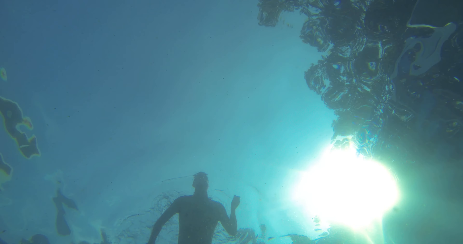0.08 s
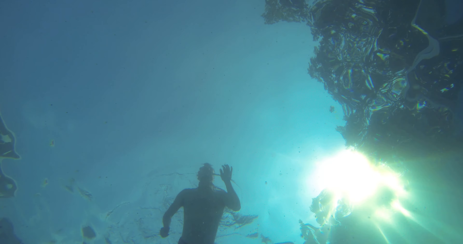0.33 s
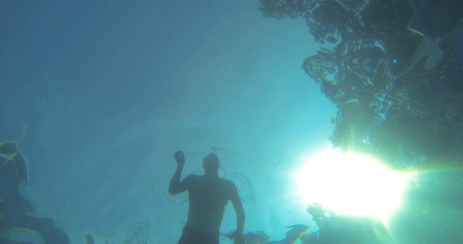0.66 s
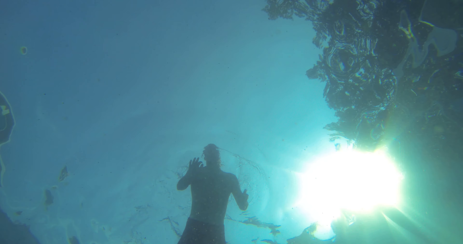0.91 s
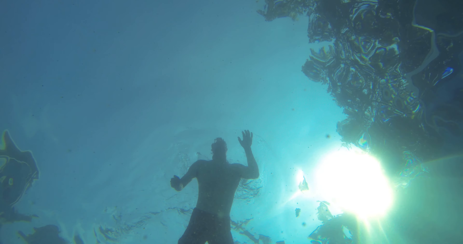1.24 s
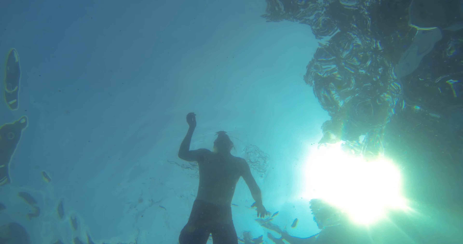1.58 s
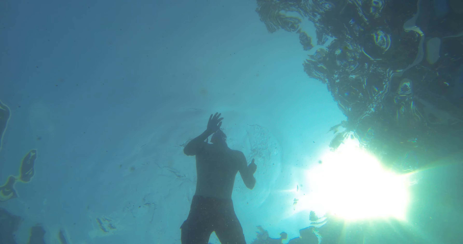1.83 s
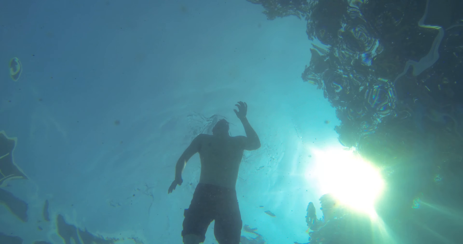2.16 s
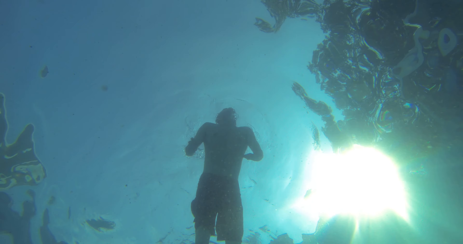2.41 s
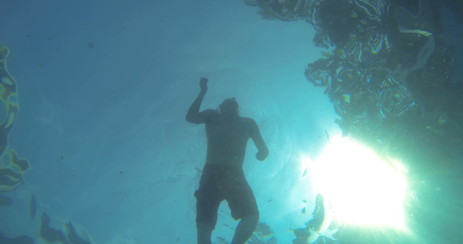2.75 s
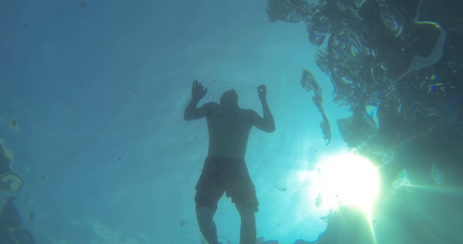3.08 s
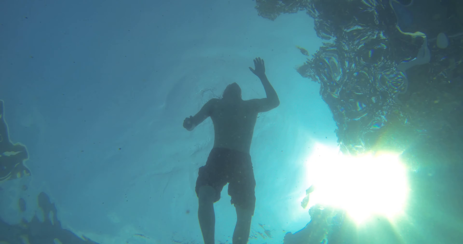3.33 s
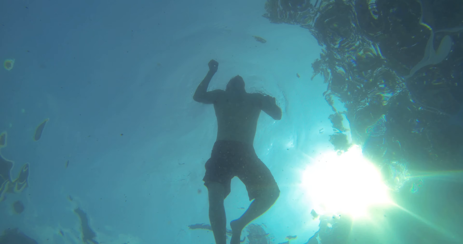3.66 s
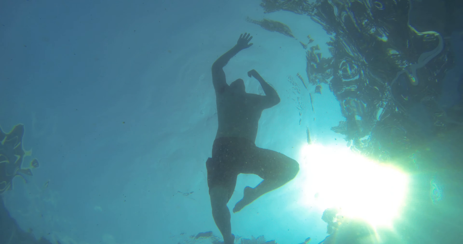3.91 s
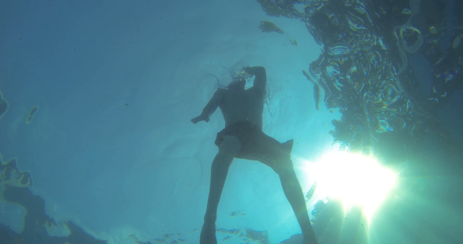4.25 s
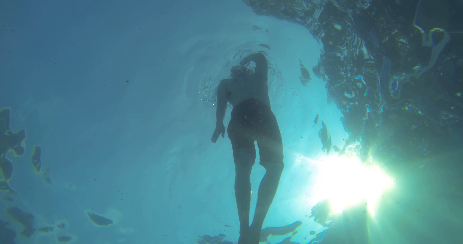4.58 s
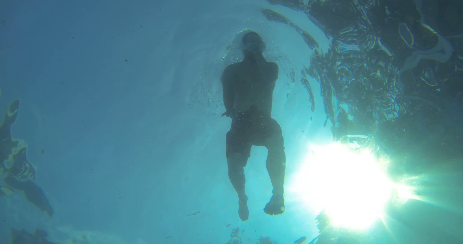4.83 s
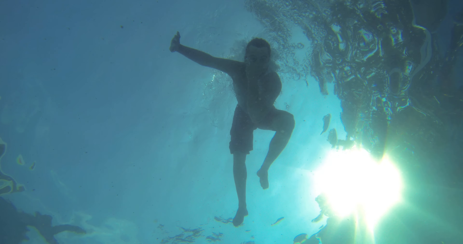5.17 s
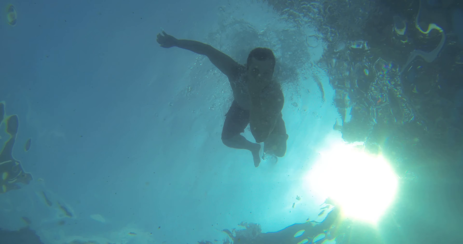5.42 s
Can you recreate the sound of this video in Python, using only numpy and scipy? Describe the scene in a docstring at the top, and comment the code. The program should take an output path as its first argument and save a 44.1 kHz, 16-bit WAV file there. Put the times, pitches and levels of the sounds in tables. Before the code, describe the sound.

The sound is underwater and muffled, picked up through a waterproof camera case below a swimmer. A faint low hum, soft hiss and thin, high pulsing whine from the camera run throughout. For the first four seconds the swimmer paddles gently at the surface: soft irregular sloshes, a fine trickle and small ringing bubble plinks, a little clearer around 2.5 seconds. At about 4.1 seconds a sudden loud slap and glug hits the water, followed by light spray, tiny ticks and stronger sloshing. From about 4.5 seconds the swimmer dives, with smaller slaps and deep gurgles of air dragged under. Kicks push out low thumps from 4.7 seconds, with a loud pop and the heaviest thump between 4.8 and 4.9 seconds. Glugs, froth and plinks continue and ease off, with one softer gurgling surge near 5.4 seconds.

```python
"""Muffled plinks and sloshes, then a slap, deep gurgles and a thump, over faint hum, whine and hiss.
A swimmer paddles overhead, smacks the surface and dives, heard from below through a waterproof case.
His hands shed small ringing bubbles; the dive drags down air pockets that gurgle; his kicks send
pressure waves. The hum, pulsing whine and hiss come from the camera inside the case."""
import sys
import numpy as np
from scipy import signal
from scipy.fft import rfft, irfft, next_fast_len
from scipy.io import wavfile
from scipy.ndimage import uniform_filter1d

SR = 44100
rng = np.random.default_rng(int(sys.argv[2]) if len(sys.argv) > 2 else 0)


def unload_wav(signal):
    """Save mono or channel-first audio to the path in sys.argv[1] as 16-bit WAV at rate SR, clipped to [-1, 1]."""
    wavfile.write(
        sys.argv[1],
        SR,
        np.round(np.clip(np.atleast_2d(signal).T, -1, 1) * 32767).astype(np.int16),
    )


N = 251370
TIME_S = np.arange(N) / SR

# Camera tones. Each row: frequency in Hz, level in dB.
HUM_TONES = [(57.4, -42.0), (120, -49.8), (177.5, -68), (239.8, -64), (344.4, -62.5), (3343, -74),
             (10288, -85)]
# Camera noise spectrum. Each row: frequency in Hz, relative gain in dB.
HISS_EQ = [(8, -1), (42, 16), (100, -0.5), (280, -11.5), (600, -15.5), (1400, -4), (2600, -18),
           (3500, -11.5), (5200, -18), (6500, -27.5), (8500, -28.5), (9600, -24), (12500, -40),
           (14500, -38)]
# Source spectra through the case. Each row: frequency in Hz, relative gain in dB.
SPRAY_EQ = [(1100, -3), (1600, -8), (2200, -7.5), (2600, -14.5), (3070, -11), (3500, -20.5), (6000, -32),
            (9000, -44)]
TRICKLE_EQ = [(150, -27.5), (210, -5.5), (290, -16.5), (400, -9.5), (580, -10.5), (800, -6.5), (1130, 4),
              (1300, 3), (1600, 8), (1900, 2.5), (2300, -13), (4000, -73)]
FROTH_EQ = [(550, -19.5), (660, -12.5), (780, -5.5), (1100, -2), (1350, -5), (1700, -5), (2150, -18),
            (2750, -23), (3080, -15.5), (3600, -30), (5500, -21), (7000, -36)]
GURGLE_EQ = [(70, -17), (125, -9), (165, -4), (260, 1), (400, 6), (490, -1.5), (570, -12.5), (800, -40.5),
             (3000, -99)]
EDDY_EQ = [(8, -30), (20, -1), (55, 20), (100, 3.5), (180, -23), (1500, -92)]
SLAP_EQ = [(150, -39), (450, 6), (600, -14), (850, 6.5), (1350, -1.5), (1900, -20), (2450, -27),
           (3080, -24), (3500, -22), (5000, -31), (7500, -36), (11000, -77)]
# Tiny bubbles bursting near the case. Each row: start in seconds, level in dB, band centre in Hz.
BUBBLE_TICKS = [(0.933, -49, 5800), (2.124, -44.5, 5400), (4.117, -39.5, 3120), (4.155, -47, 3200),
                (4.258, -47, 3130), (4.445, -43, 4500), (4.619, -39, 3080), (4.766, -42.5, 4400),
                (5.027, -44, 3130)]
# Falling spray. Each row: centre in seconds, level in dB, half width in seconds.
SPRAY_FALLS = [(.725, -49, .012), (4.23, -49.5, 0.062), (4.583, -48.5, 0.013), (4.68, -52.5, 0.41)]
# Hand pulls. Each row: centre in seconds, froth in dB, gurgle in dB, half width in seconds.
HAND_STROKES = [(0.109, -53, -68, 0.11), (0.719, -48, -62, 0.011), (0.906, -63, -72, 0.06),
                (1.402, -45, -53, 0.025), (1.581, -52.5, -74, 0.043), (1.78, -51, -59, 0.041),
                (1.94, -52.5, -54, 0.06), (2.219, -60, -59, 0.077), (2.454, -54, -61, 0.036),
                (2.913, -56, -68, 0.027), (3.62, -57, -57, 0.029), (4.176, -46, -45, 0.064),
                (4.376, -48, -54, 0.13), (4.541, -45.5, -44, 0.029)]
# Distinct surface bubbles. Each row: start in seconds, pitch in Hz, level in dB, decay in ms.
SURFACE_BUBBLES = [(.185, 1405, -38, 8.9), (.686, 1065, -30.5, 4.2), (.843, 1180, -39.5, 29),
                   (1.032, 1084, -33, 5.5), (1.321, 1670, -38.5, 7.2), (1.390, 1122, -34.5, 18),
                   (1.755, 1120, -36.5, 6), (2.071, 1620, -25, 1.7), (2.165, 1450, -34.5, 11),
                   (2.470, 1730, -29, 2.6), (2.482, 1114, -22, 8.6), (2.553, 1080, -33, 7.2),
                   (2.568, 1630, -22, 3.1), (2.882, 1130, -26.5, 2.8), (3.856, 1480, -36, 8),
                   (4.177, 1080, -28, 7.1), (4.227, 934, -26, 9.2), (4.340, 813, -35.5, 11),
                   (4.371, 850, -31.5, 5.8), (4.535, 935, -34, 11), (4.657, 810, -24, 4.4),
                   (4.715, 930, -22, 4.1), (4.972, 793, -18.5, 5.9), (5.061, 1060, -25.5, 24),
                   (5.106, 836, -23.5, 9.9), (5.194, 1180, -22, 7.3), (5.560, 897, -22.5, 7.7)]
# Large air pockets. Each row: start in seconds, pitch in Hz, level in dB, decay in ms.
AIR_POCKETS = [(.666, 390, -44.5, 20), (1.898, 385, -42, 12), (2.097, 206, -37, 7.5), (2.246, 319, -39, 14),
               (4.077, 440, -28, 5.9), (4.1144, 453, -2, 4.2), (4.131, 456, -18.5, 4.8),
               (4.400, 263, -22, 1.36), (4.5548, 250.5, -10, 9.3), (4.654, 332, -19, 10),
               (4.819, 198, 3, 1.94), (4.899, 252, -8, 2.1), (4.943, 159, -14.5, 20),
               (4.985, 173, -18.5, 24), (5.026, 390, -19, 6.1), (5.085, 346, -15, 9.2),
               (5.235, 386, -22, 30)]
# Skin hitting the surface. Each row: start in seconds, peak in dB, spray decay in ms.
SKIN_SLAPS = [(4.1128, -16, 10), (4.1209, -24, 2), (4.129, -23, 1.2), (4.227, -39, 5.8),
              (4.557, -23.5, 1.6), (4.621, -27, 1.7)]
# Leg pressure waves. Each row: centre in seconds, level in dB, edge in ms, decay in ms.
LEG_KICKS = [(4.707, -16, 4.3, 15), (4.76, -20.5, 6, 16), (4.822, -20, 4.5, 13), (4.866, -4.5, 1.74, 12)]
# Trunk, legs, then an arm pull below. Each row: start in seconds, gurgle, froth and eddies in dB.
BODY_PLUNGES = [(4.555, -27.5, -33.5, -29), (4.85, -23.5, -42, -29.5), (5.39, -34.5, -41.5, -50)]

# Whine gate. Each burst: start and length as fractions of the camera's work cycle.
WHINE_HZ, CYCLE_HZ, WHINE_BURSTS = 6932, 11.988, [(.597, .178), (.838, .185)]
CASE_RING_HZ, CASE_DECAY_S, CASE_NOTCH_HZ, CASE_NOTCH_Q = 3120, .009, 587, 4.2
TRICKLE_DB, TRICKLE_FALL_DB_PER_S = -51.5, .27
STRAY_LOW_HZ, STRAY_HIGH_HZ, STRAY_SPREAD_S, STRAY_DECAY_CYCLES = 874, 1600, .09, 7.9


def undb(db):
    """Decibels to gain."""
    return 10 ** (np.asarray(db) / 20)


def steady(x, window_s):
    """Hold the running rms at 1."""
    return x / np.sqrt(uniform_filter1d(x ** 2, int(window_s * SR)) + 1e-12)


def colour(x, eq):
    """Minimum-phase filter through (Hz, dB) points."""
    hz, db = np.transpose(eq)
    size = 2 * next_fast_len(len(x))
    bins_hz = np.maximum(np.arange(size // 2 + 1) * SR / size, 1)
    gain = undb(np.interp(np.log(bins_hz), np.log(hz), db))
    cepstrum = irfft(np.log(gain))
    cepstrum[1:size // 2] *= 2
    cepstrum[size // 2 + 1:] = 0
    return irfft(rfft(x, size) * np.exp(rfft(cepstrum)))[:len(x)]


def add(out, start_s, sound):
    """Mix a sound in at start_s."""
    start = int(np.clip(start_s * SR, 0, N - 1))
    out[start:start + len(sound)] += sound[:N - start]


def swells(table, db_column):
    """Gain curve: one Gaussian per row."""
    return sum(undb(row[db_column]) * np.exp(-((TIME_S - row[0]) / row[-1]) ** 2) for row in table)


def surges(db_column, fall_db_per_s, attack_s=.018):
    """Gain curve: each plunge rises fast, then decays; plunges add in power."""
    power = np.zeros(N)
    for row in BODY_PLUNGES:
        age_s = np.maximum(TIME_S - row[0], 0)
        attack = np.minimum(age_s / attack_s, 1)
        power += (attack * undb(row[db_column] - fall_db_per_s * age_s)) ** 2
    return np.sqrt(power)


def bubble(hz, decay_s, glide, pinch_cycles):
    """Trapped air pinches off and rings, its pitch climbing as it nears the surface."""
    t = np.arange(int(np.log(1000) * decay_s * SR) + 2) / SR
    cycles = hz * t * (1 + glide * t / (2 * decay_s))
    onset = 1 - np.exp(-cycles / pinch_cycles)
    return -np.sin(2 * np.pi * cycles) * np.exp(-t / decay_s) * onset


def swarm(low_hz, high_hz, decay_cycles, spread_db, count):
    """Bubbles of random time and size, a few louder than the rest."""
    out = np.zeros(N)
    for when, pitch, loud, ring in rng.random((count, 4)):
        hz = low_hz * (high_hz / low_hz) ** pitch
        gain = undb(-spread_db * np.log(1 - .98 * loud))
        decay_s = decay_cycles * (.5 + ring) / hz
        add(out, when * N / SR, gain * bubble(hz, decay_s, glide=.031, pinch_cycles=.26))
    return out


def camera():
    """The electronics hum, hiss, and whine in pairs of short bursts."""
    hum = sum(undb(db) * np.sqrt(2) * np.sin(2 * np.pi * (hz * TIME_S + rng.random()))
              for hz, db in HUM_TONES)
    gate = sum(((TIME_S * CYCLE_HZ - start) % 1 < length) * 1. for start, length in WHINE_BURSTS)
    phase = 2 * np.pi * WHINE_HZ * TIME_S
    tone = undb(-60) * np.sin(phase) + undb(-79.5) * np.sin(2 * phase)
    whine = uniform_filter1d(gate, SR // 1000) * tone
    hiss = colour(rng.standard_normal(N), HISS_EQ)
    hiss /= np.sqrt(np.mean(hiss ** 2))
    return undb(.33) * hum + whine + undb(-47) * hiss


def ticks():
    """Tiny bubbles burst; the case wall rings faintly."""
    out, t = np.zeros(N), np.arange(SR // 20) / SR
    ring = undb(-5) * np.sin(2 * np.pi * CASE_RING_HZ * t) * np.exp(-t / CASE_DECAY_S)
    for start_s, db, hz in BUBBLE_TICKS:
        band = signal.butter(3, [.87 * hz, 1.13 * hz], "band", fs=SR, output="sos")
        crack = signal.sosfilt(band, rng.standard_normal(len(t)) * np.exp(-t / .0015))
        add(out, start_s, undb(db) * (crack / np.abs(crack).max() + ring))
    return out


def spray():
    """Drops land, each trapping a tiny bubble."""
    drops = colour(swarm(1330, 9200, decay_cycles=3.1, spread_db=6, count=4000), SPRAY_EQ)
    return steady(drops, window_s=.027) * swells(SPRAY_FALLS, db_column=1)


def trickle():
    """Fine surface bubbles, fading slowly as the paddling calms."""
    bubbles = colour(swarm(172.5, 2185, decay_cycles=4, spread_db=2, count=8000), TRICKLE_EQ)
    return steady(bubbles, window_s=.059) * undb(TRICKLE_DB - TRICKLE_FALL_DB_PER_S * TIME_S)


def froth():
    """Small bubbles seething at an even level."""
    bubbles = swarm(650, 6080, decay_cycles=2.9, spread_db=.5, count=11000)
    return steady(colour(bubbles, FROTH_EQ), window_s=.044)


def gurgle():
    """Large bubbles wobbling at an even level."""
    bubbles = swarm(107.5, 527, decay_cycles=1.77, spread_db=2.2, count=3000)
    return steady(colour(bubbles, GURGLE_EQ), window_s=.025)


def strays(min_db=-43.25, range_db=5):
    """Each stroke sheds three small ringing bubbles."""
    out = np.zeros(N)
    for centre_s, *_ in HAND_STROKES:
        for when, pitch, loud, ring in rng.random((3, 4)):
            hz = STRAY_LOW_HZ * (STRAY_HIGH_HZ / STRAY_LOW_HZ) ** pitch
            decay_s = STRAY_DECAY_CYCLES * (.5 + ring) / hz
            plink = undb(min_db + range_db * loud) * bubble(hz, decay_s, glide=.017, pinch_cycles=1.4)
            add(out, centre_s + STRAY_SPREAD_S * (2 * when - 1), plink)
    return out


def sloshes():
    """Each hand pull stirs up froth and gurgle."""
    return froth() * swells(HAND_STROKES, db_column=1) + gurgle() * swells(HAND_STROKES, db_column=2)


def plinks():
    """Single bubbles pinch off at the surface and ring."""
    out = np.zeros(N)
    for start_s, hz, db, decay_ms in SURFACE_BUBBLES:
        add(out, start_s, undb(db) * bubble(hz, decay_ms / 1000, glide=.014, pinch_cycles=.79))
    return out


def glugs():
    """Air pockets close under a limb and ring; the case wall blocks one band."""
    out = np.zeros(N)
    for start_s, hz, db, decay_ms in AIR_POCKETS:
        add(out, start_s, undb(db) * bubble(hz, decay_ms / 1000, glide=.03, pinch_cycles=.38))
    return signal.lfilter(*signal.iirnotch(CASE_NOTCH_HZ, CASE_NOTCH_Q, fs=SR), out)


def slaps():
    """Skin smacks the water: a pressure spike and short spray, muffled by the case."""
    out, t = np.zeros(N), np.arange(SR // 10) / SR
    for start_s, peak_db, decay_ms in SKIN_SLAPS:
        pressure = .06 * rng.standard_normal(len(t)) * np.exp(-t / (decay_ms / 1000))
        pressure[0] -= 1  # spike
        hit = colour(pressure, SLAP_EQ)
        add(out, start_s, undb(peak_db) * hit / np.abs(hit).max())
    return out


def kicks():
    """A cavity opens behind the feet and collapses: suction, then a steep push."""
    out = np.zeros(N)
    for centre_s, db, edge_ms, decay_ms in LEG_KICKS:
        t_ms = (TIME_S - centre_s) * 1000
        out += undb(db) * np.tanh(t_ms / edge_ms) * np.exp(-np.hypot(t_ms, 1) / decay_ms)
    return out


def dive():
    """Air dragged under breaks into gurgle and froth; eddies press on the case."""
    eddies = steady(colour(rng.standard_normal(N), EDDY_EQ), window_s=.18)
    return (gurgle() * surges(db_column=1, fall_db_per_s=28.5)
            + froth() * surges(db_column=2, fall_db_per_s=9.5)
            + eddies * surges(db_column=3, fall_db_per_s=62))


def scene():
    """Swimmer and camera, mono."""
    splashes = plinks() + glugs() + slaps() + ticks() + spray()
    paddling = trickle() + strays() + sloshes()
    return (splashes + paddling + dive() + kicks() + camera())[None]


def record(dry):
    """3 ms fades, 12 Hz high-pass, steep 14.7 kHz low-pass."""
    fade = np.clip(np.minimum(TIME_S, TIME_S[-1] - TIME_S) / .003, 0, 1)
    high_pass = signal.butter(1, 12, "high", fs=SR, output="sos")
    low_pass = signal.ellip(10, .2, 70, 14700, fs=SR, output="sos")
    return signal.sosfilt(low_pass, fade * signal.sosfilt(high_pass, dry))


dry = scene()
out = record(dry)
unload_wav(out)
```